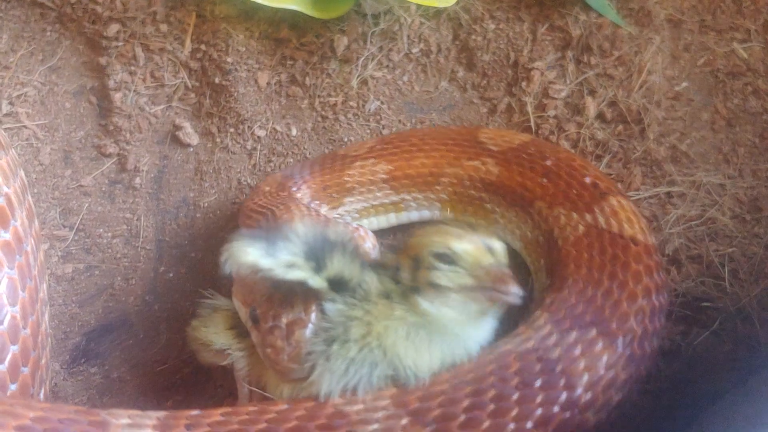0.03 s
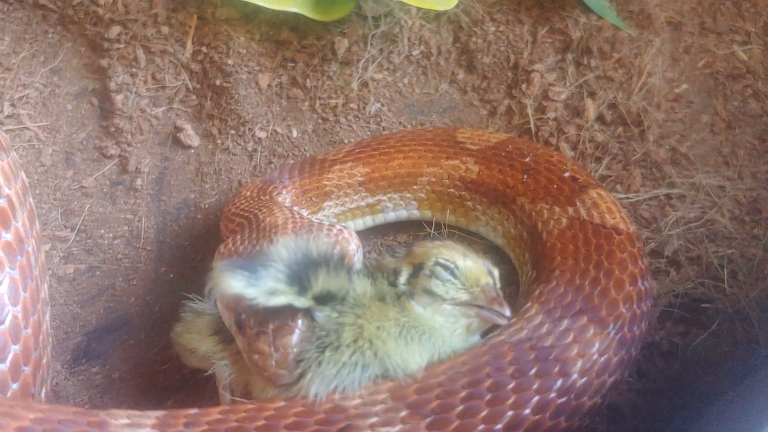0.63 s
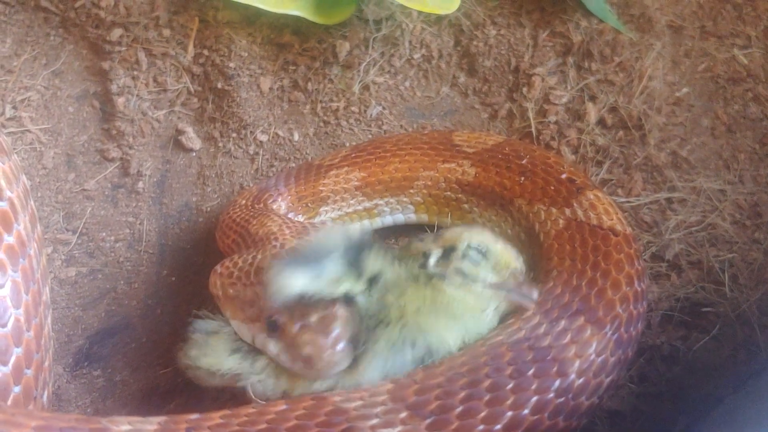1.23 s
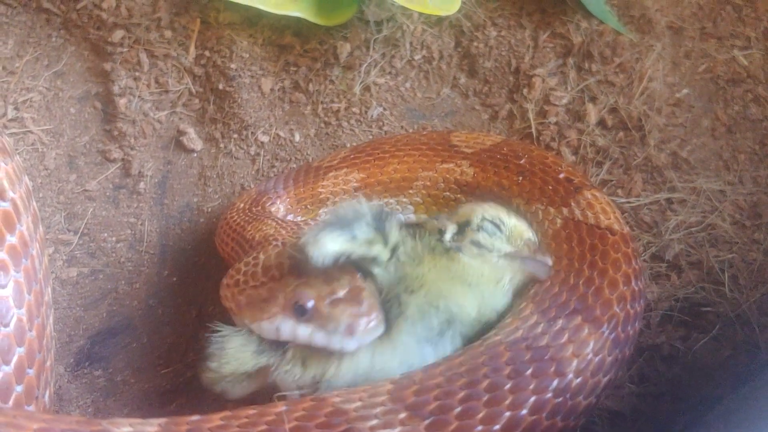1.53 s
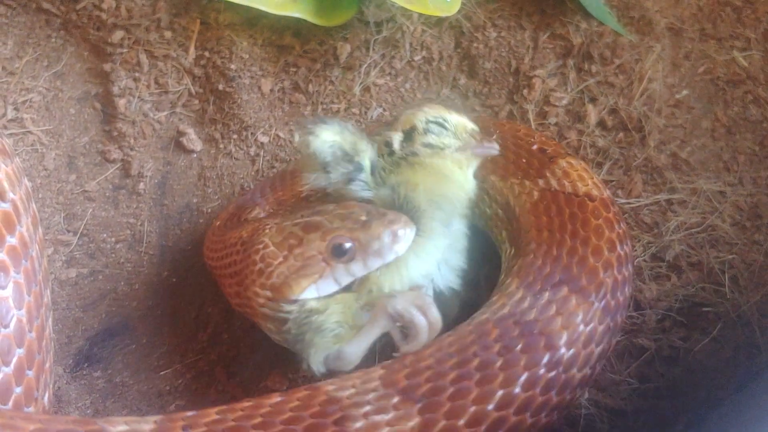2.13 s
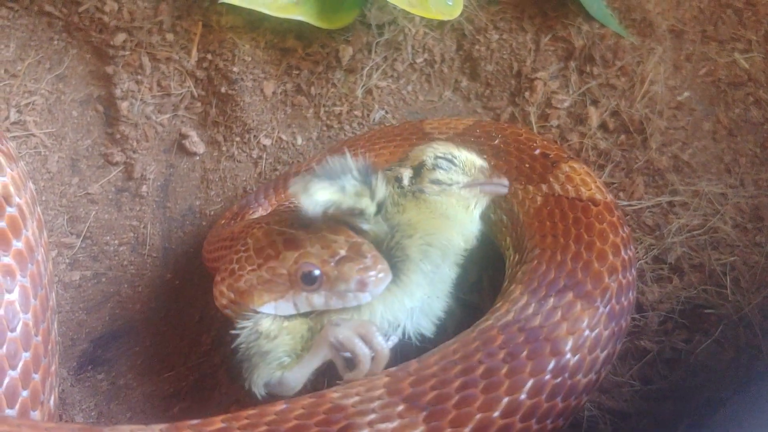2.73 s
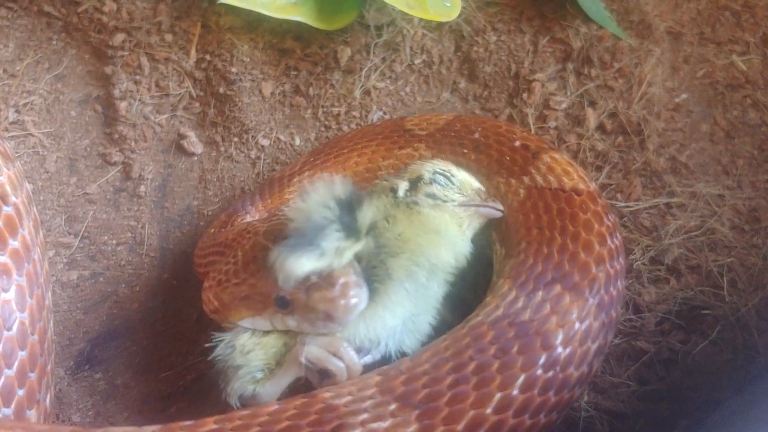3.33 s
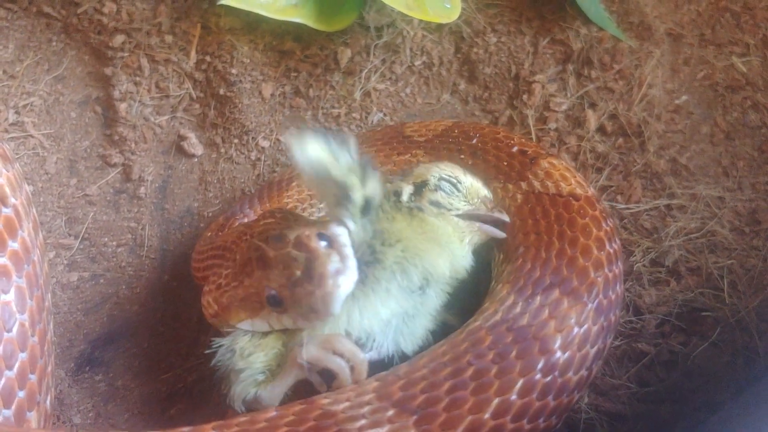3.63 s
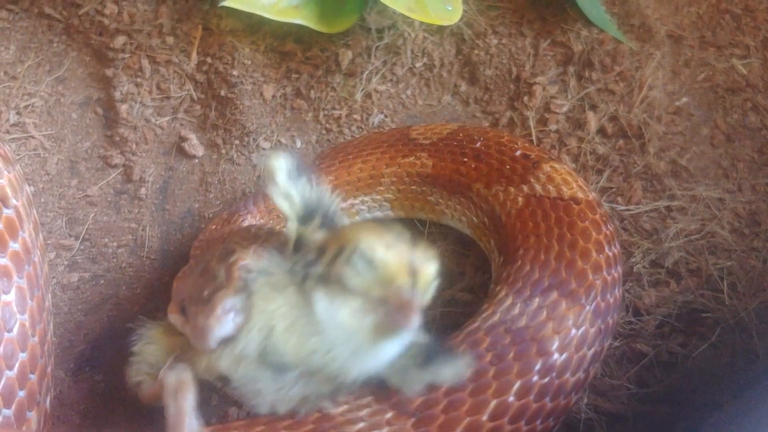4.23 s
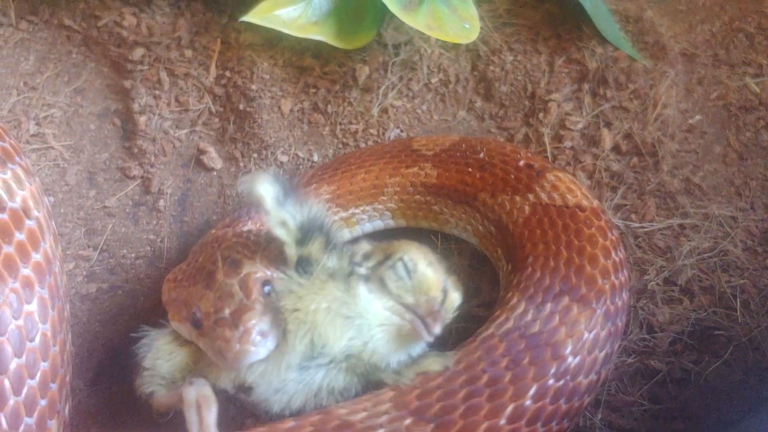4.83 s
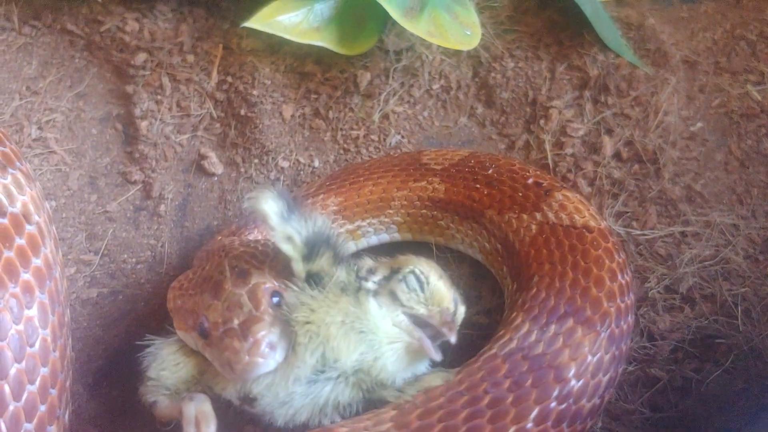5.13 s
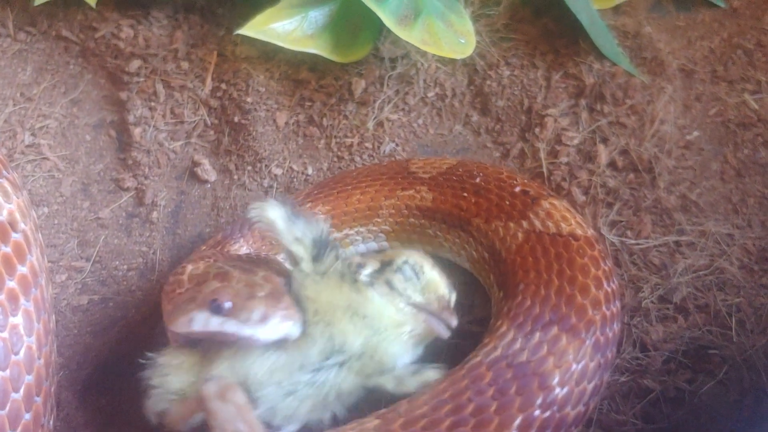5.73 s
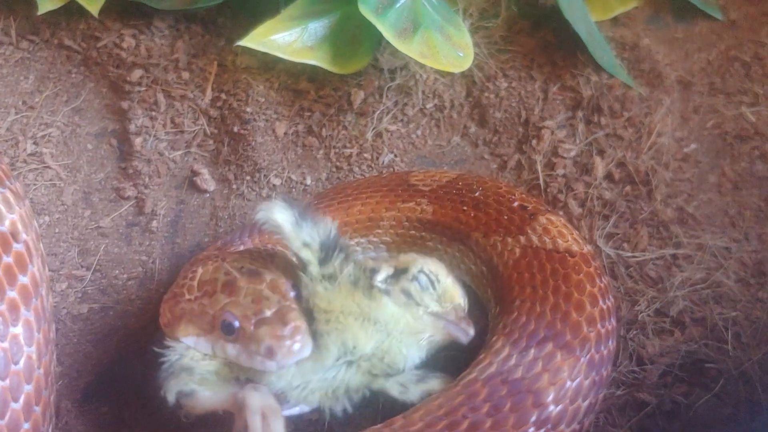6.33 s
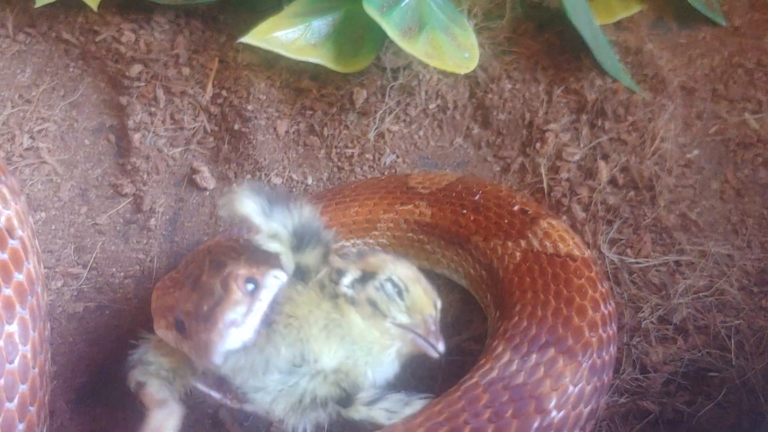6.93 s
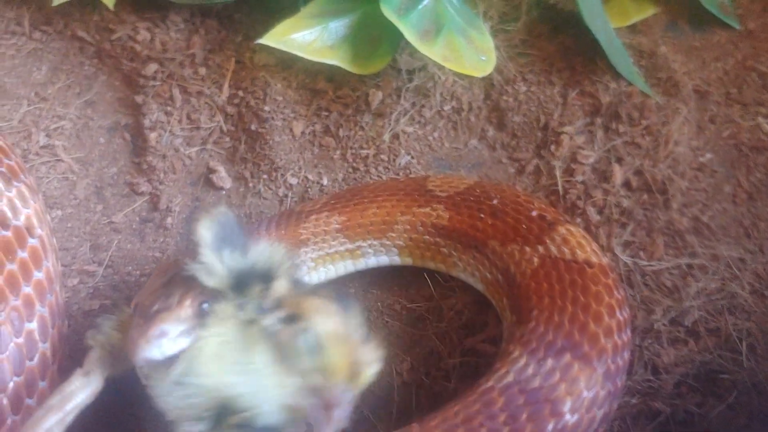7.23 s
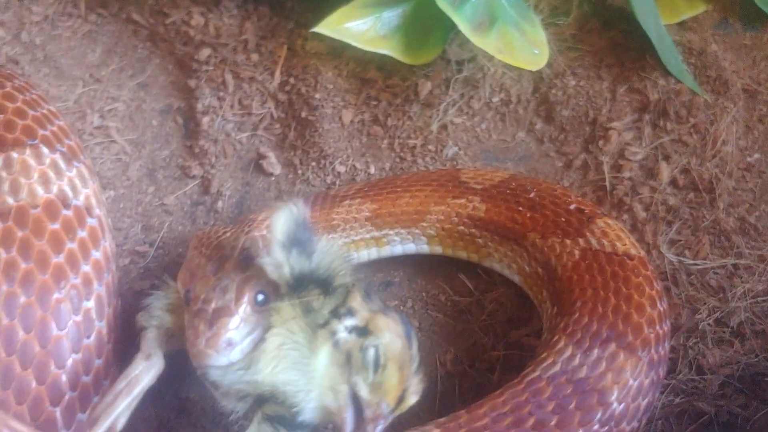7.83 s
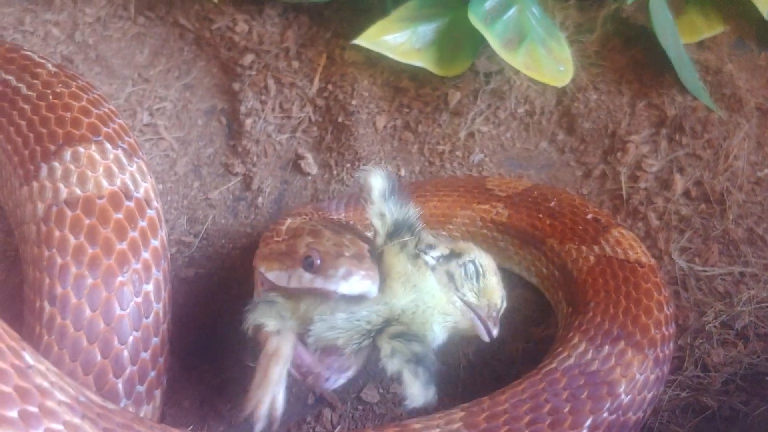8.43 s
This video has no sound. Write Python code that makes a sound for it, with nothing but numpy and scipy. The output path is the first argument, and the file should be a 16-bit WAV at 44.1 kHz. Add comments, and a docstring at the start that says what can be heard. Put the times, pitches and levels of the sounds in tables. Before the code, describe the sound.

Close to a phone microphone in a small terrarium, a quail chick held by a snake makes scattered dry creaks and thin, falling peeps, with tiny beak ticks. A wavering squawk rises about halfway through, then more peeps follow. Two light knocks on the phone and a faint dry rustle come late. Underneath, a low room rumble and hum pulses, briefly dropping between the calls.

```python
"""In a small terrarium, a quail chick held by a snake gives short falling peeps, dry creaks and one
rising squawk, close to a phone. Its syrinx either whistles a note that swells, sinks and fades, or flaps
in slowing pulses; a faint beak tick follows many calls. The bedding rustles and the phone is bumped
twice. Behind it all a room hums and throbs; the phone's noise suppressor briefly ducks the background
between calls."""
import sys
import numpy as np
from scipy import signal
from scipy.fft import rfft, irfft
from scipy.io import wavfile

SR = 44100
rng = np.random.default_rng(int(sys.argv[2]) if len(sys.argv) > 2 else 0)


def persist_wave(psi):
    """Save psi, clipped to +-1, as 16-bit WAV."""
    counts = np.round(np.clip(psi, -1, 1) * 32767).astype(np.int16)
    wavfile.write(sys.argv[1], SR, np.atleast_2d(counts).T)


N = 379260
T = np.arange(N) / SR

# Resonance of the chick's throat: freq_hz, relative_db
THROAT = [(500, -44), (1600, -40), (2200, -11), (2650, -17.5), (3300, 2.5), (4500, -3.5), (5700, -7.5),
          (6600, -15), (7800, -24.5), (9400, -30.5), (11000, -32.5), (13000, -44)]


def peeps(flutter_hz=900, pitch_jitter=0.068, third_db=-33, fourth_db=-40, edge_s=0.0012, rasp_db=-5):
    """The syrinx whistles a note whose octave the throat favours; strain shakes it and adds a rasp."""
    # Falling notes: start_s, length_s, crest_after_s, first_hz, last_hz,
    # bend (1 straight, more = steeper start), fundamental_db, octave_db, roughness (0-1)
    notes = [ (1.298, 0.023, 0.011, 2760, 2600, 1.8, -48, -46.5, .25),
             (1.750, .048, 0.015, 2376, 2165, 1.55, -44.5, -46, 0.4),
             (2.871, 0.027, .003, 2520, 2325, 1.9, -47, -45.5, 0.054),
             (3.493, 0.056, .010, 2814, 2470, 1.44, -41.5, -37.5, 0.037),
             (4.254, 0.046, .012, 4010, 2570, 3.1, -39, -44, 0.15),
             (4.594, 0.035, .002, 3150, 2820, 2.3, -51, -60, 0.36),
             (5.645, 0.011, .001, 2690, 2400, 2, -56, -46, 0.6),
             (5.658, 0.057, 0.02, 3250, 2644, 2.3, -36, -34.5, .04),
             (5.659, 0.02, .003, 3640, 3580, 0.74, -41, -62, 0.085),
             (6.118, 0.028, .002, 2650, 2330, 2.3, -46.5, -50, .12),
             (6.477, 0.028, .004, 3100, 2610, 2.6, -44.5, -43.5, 0.075),
             (6.938, .038, .003, 2097, 1680, 1.98, -73, -43, .12),
             (6.960, 0.043, 0.013, 2710, 2570, 1.2, -45, -44.5, 0.52),
             (6.992, 0.021, .003, 2870, 2630, 2.6, -48, -45, .05),
             (7.354, 0.044, .007, 2490, 2445, 1.6, -36, -50.5, 0.31),
             (8.182, 0.017, .001, 2700, 2480, 2.6, -50.5, -49.5, .06),
             (8.571, 0.02, .008, 2500, 1920, 4.5, -75, -37, 0.25), ]
    out, shake, tremble = np.zeros(N), wander(flutter_hz), wander(flutter_hz)
    turbulence = unit(signal.fftconvolve(rng.standard_normal(N), ring(THROAT))[:N])
    for s, hz, base_db, octave_db, rough in [peep_contour(*row) for row in notes] + [squawk_contour()]:
        t = T[:len(hz)]
        span = (int(s * SR) + np.arange(len(hz))) % N
        phase = 2 * np.pi * np.cumsum(hz * (1 + pitch_jitter * rough * shake[span])) / SR
        harmonics_db = [base_db, octave_db, octave_db + third_db, octave_db + fourth_db]
        tone = sum(undb(db) * np.sin((k + 1) * phase) for k, db in enumerate(harmonics_db))
        strained = tone * (1 + rough * tremble[span]) / np.sqrt(1 + rough ** 2)
        rasp = rough * undb(octave_db + rasp_db) * turbulence[span]
        edges = np.clip(np.minimum(t, t[-1] - t) / edge_s, 0, 1)
        add(out, s, edges * (strained + rasp))
    return out


def peep_contour(s, length, crest_s, first_hz, last_hz, bend, base_db, octave_db, rough):
    """One peep: the pitch falls, the level swells and dies ever faster, the hoarse start clears."""
    rise_db, fade_db, fade_bend = 9, 19.5, 1.38
    onset_rough, settle_s = .35, 0.0057
    t = T[:int(length * SR)]
    rising = np.clip(1 - t / max(crest_s, 1 / SR), 0, 1)
    fading = np.clip((t - crest_s) / max(length - crest_s, 1 / SR), 0, 1)
    effort_db = -rise_db * rising - fade_db * fading ** fade_bend
    thinning_db = 9 * (t - crest_s) / length  # the fundamental weakens against the octave
    hz = last_hz + (first_hz - last_hz) * (1 - t / length) ** bend
    hoarse = np.clip(rough + onset_rough * np.exp(-t / settle_s), 0, 1)
    return s, hz, base_db + effort_db - thinning_db, octave_db + effort_db, hoarse


def squawk_contour(waver=0.032, waver_hz=160):
    """One side of the syrinx strains upward in a wavering squawk, over a peep from the other side."""
    # Path of the squawk: time_s, pitch_hz, fundamental_db, octave_db, roughness (0-1)
    path = [(4.252, 2313, -55, -62, 0.8), (4.268, 1980, -43, -35, 0.65), (4.277, 2145, -37, -36.5, 0.1),
            (4.289, 2180, -36, -34, 0.2), (4.298, 2530, -32, -36, 0.17), (4.315, 2450, -54, -55, 0.3)]
    s, *columns = np.transpose(path)
    t = T[int(s[0] * SR):int(s[-1] * SR)]
    hz, base_db, octave_db, rough = (np.interp(t, s, column) for column in columns)
    return s[0], hz * (1 + waver * wander(waver_hz)[:len(t)]), base_db, octave_db, rough


def creaks(jitter=0.1, scatter_db=2, kick_db=2, flap_db=-6, flap_t60_s=0.0088, flap_spread=0.14):
    """With little air the syrinx only flaps: uneven, slowing pulses that each ring in the throat."""
    # Pulse trains: start_s, length_s, first_rate_hz, level_db, level_change_db, flap_ring_hz
    trains = [ (0.186, 0.011, 410, -34.5, -18, 3380), (1.2968, 0.02, 430, -32, -11, 3430),
              (1.7467, 0.041, 440, -31.5, -8, 3820), (2.341, .026, 430, -35, -5.5, 3680),
              (3.874, 0.03, 360, -27.5, -12, 4040), (4.2508, .044, 710, -35.5, 7.5, 4100),
              (6.1083, .008, 480, -39, -6, 4130), (6.9403, 0.05, 460, -35.5, -2, 5200),
              (7.6837, 0.014, 380, -35, -12, 5100), ]
    # Single pulses of the syrinx, some of them the sharp start of a peep: start_s, level_db
    chips = [(1.3287, -51), (2.3185, -51), (2.3261, -38), (2.3477, -27.5), (2.3627, -32), (3.4931, -31),
             (6.4785, -40.5), (7.3562, -44), (8.592, -38)]
    slowing = .45  # share of the pulse rate lost as the air runs out
    out, click, t = clicks(chips, THROAT), ring(THROAT), T[:SR // 50]
    envelope = decay(t, flap_t60_s) * (1 - np.exp(-t / 0.00026))
    for s, length, rate, db, change_db, hz in trains:
        done = 0
        for stretch, strength, tension in rng.standard_normal(size=(40, 3)):
            if done > 1:
                break
            accent_db = scatter_db * strength if done else kick_db
            gain = undb(db + change_db * done + accent_db)
            flap = envelope * np.sin(2 * np.pi * hz * np.exp(flap_spread * tension) * t)
            add(out, s + done * length, gain * click)
            add(out, s + done * length, gain * undb(flap_db) * flap)
            done += np.exp(jitter * stretch) / (rate * length * (1 - slowing * done ** 2))
    return out


def beak_ticks():
    """The beak gives a faint, bright tick after many calls."""
    # Ticks: start_s, level_db
    ticks = [(.2415, -47), (.790, -51), (1.3745, -50), (1.8212, -44.5), (2.4108, -44.5), (3.9417, -50),
             (6.1826, -50), (6.5907, -49), (7.055, -43.5), (7.3497, -38), (7.7729, -48)]
    # Resonance of the beak: freq_hz, relative_db
    beak = [(1000, -37), (3000, -13), (4500, -0.5), (6300, 7), (8000, -3.5), (12000, -30)]
    return clicks(ticks, beak)


def rustle(grain_db=5):
    """Dry fibres slip under the snake in many tiny grains."""
    # Shifts of the bedding: middle_s, length_s, level_db
    shifts = [(7.58, 0.61, -63), (7.8, 0.15, -62), (7.9, 0.097, -62)]
    # Colour of the fibres: freq_hz, relative_db
    bedding = [(600, -6), (1550, 5), (2400, -11), (3900, -6.5), (5200, -18), (9000, -26.5)]
    grains = rng.standard_normal(N) * undb(grain_db * wander(300))
    humps = sum(undb(db) * np.cos(np.pi * np.clip((T - s) / length, -.5, .5))
                for s, length, db in shifts)
    return unit(signal.fftconvolve(grains, ring(bedding))[:N]) * humps


def terrarium(x, wet_db=-13, box_t60_s=0.086, room_t60_s=.4, room_db=-17, left_lag_s=.0002):
    """Sound reaches the right mic first, dies quickly in the box and lingers faintly in the room."""
    # The nearer right mic hears the chick's low notes better: freq_hz, left_minus_right_db
    pan = [(2200, -8.5), (3400, -5), (4500, -7), (5600, 4.5)]
    t = T[:SR // 3]
    envelope = decay(t, box_t60_s) + undb(room_db) * decay(t, room_t60_s)
    channels = []
    for sign, lag_s in ((1, left_lag_s), (-1, 0)):
        panned = irfft(rfft(x) * undb(sign * spectrum(pan, N) / 2), N)
        direct = np.pad(panned, (round(lag_s * SR), 0))[:N]
        tail = rng.standard_normal(len(t)) * envelope * (t > .002)
        reverb = signal.fftconvolve(x, tail / np.linalg.norm(tail))[:N]
        channels.append(direct + undb(wet_db) * reverb)
    return np.array(channels)


def bumps(crunch_t60_s=0.068):
    """A knock on the phone's case rings a few short modes, mostly on the left, with a dull crunch."""
    # Knocks: start_s, crunch_db, modes as (pitch_hz, left_db, right_db, t60_s)
    knocks = [ (7.0022, -52, [(360, -14.5, -18, 0.0062), (1110, -14.5, -47, 0.0056),
              (1370, -27, -53, 0.013), (2090, -24.5, -56, 0.016), (6530, -26.5, -55, 0.0049),
              (8900, -27.5, -58, 0.0016)]), (7.7048, -39.5, [(70.3, -20, -23, 0.17), (347, -30, -37, 0.033),
              (1020, -41, -31, 0.0031), (1620, -20, -29, 0.021), (2350, -35, -27, 0.0021),
              (3660, -28.5, -43, 0.012), (9000, -48, -61, 0.018)]), ]
    out, t = np.zeros((2, N)), T[:SR // 8]
    dull = signal.butter(4, [300, 4400], "band", fs=SR, output="sos")
    for s, crunch_db, modes in knocks:
        for hz, left_db, right_db, t60_s in modes:
            add(out, s, undb([[left_db], [right_db]]) * np.sin(2 * np.pi * hz * t) * decay(t, t60_s))
        crunch = unit(signal.sosfilt(dull, rng.standard_normal((2, len(t)))))
        add(out, s, undb(crunch_db) * crunch * decay(t, crunch_t60_s))
    return out


def room_tone(duck, level_db=-35.5):
    """A centred rumble under a diffuse hiss with a few faint resonances."""
    # Colour of the room noise: freq_hz, relative_db
    colour = [(20, -34.5), (33, 0), (55, 3.5), (75, 1.5), (97, -3.5), (170, -10.5), (250, -18.5),
              (410, -20), (800, -32.5), (1150, -33), (2600, -54), (5000, -55.5), (8000, -68.5),
              (12000, -68)]
    # Ripples in that colour: centre_hz, half_width_hz, gain_db
    ripples = [(174, 10, 6), (482, 14, -10.5), (1935, 120, 4), (3550, 210, 2), (5290, 66, 5.5),
               (6550, 240, 8)]
    # Stereo width: freq_hz, side_minus_mid_db
    width = [(60, -20), (200, -9), (350, -8), (700, 2), (2000, 0.5)]
    # Stereo balance: freq_hz, left_minus_right_db
    pan = [(60, 2.1), (250, 0), (640, -3.5), (1150, -6), (2080, 4), (3770, -3.5), (6800, 1)]
    f = np.arange(N // 2 + 1) * SR / N
    ripple_db = sum(db * np.exp(-((f - hz) / half_width) ** 2) for hz, half_width, db in ripples)
    mid, side = rfft(rng.standard_normal((2, N))) * undb(spectrum(colour, N) + ripple_db)
    sign = np.array([[1], [-1]])
    wide = mid + sign * undb(spectrum(width, N)) * side
    stereo = irfft(wide * undb(sign * spectrum(pan, N) / 2), N)
    return stereo / stereo.mean(axis=0).std() * undb(level_db) * duck


def hum(duck, drone_hz=66, drone_db=-39, waver_rad=0.93, waver_hz=7, throb_edge_s=0.046, pan_db=2.5):
    """Mains and machine hum, and a low wavering drone that throbs now and then."""
    # Hum tones: pitch_hz, level_db
    tones = [(120, -43), (239, -63), (359, -61.5), (582, -72.5), (626, -70.5), (774, -70.5), (957, -69.5)]
    # Throbs of the drone: start_s, length_s, level_db
    throbs = [(0.83, 0.083, -34.5), (2.357, 0.092, -40), (2.707, 0.29, -33.5), (3.095, 0.098, -31.5),
              (4.733, .21, -28), (5.12, 0.484, -28.5), (5.654, 0.59, -33.5)]
    mains = sum(undb(db) * np.sin(2 * np.pi * hz * T + 0.33 * wander(5.1)) for hz, db in tones)
    surge = sum(undb(db) * plateau(s, s + length, throb_edge_s, throb_edge_s)
                for s, length, db in throbs)
    phase = 2 * np.pi * drone_hz * T + waver_rad * wander(waver_hz)
    drone = (undb(drone_db) * duck + surge) * np.sin(phase)
    return (np.sqrt(2) * mains * duck + drone) * undb([[pan_db / 2], [-pan_db / 2]])


def suppressor_gain(depth_db=-9, fall_s=0.039, return_s=0.021):
    """The phone's noise suppressor briefly ducks the background at set times between calls."""
    # Ducked spans: start_s, end_s
    spans = [(.445, .785), (.91, 1.275), (1.462, 1.725), (1.955, 2.308), (2.492, 2.86), (2.93, 3.472),
             (4.955, 5.29), (5.355, 5.622)]
    return undb(depth_db * sum(plateau(start, end, fall_s, return_s) for start, end in spans))


def shade_bass(x, shelf_hz=115):
    """The low end of the background starts weak and fills out."""
    # Bass ride: time_s, gain_db
    ride = [(0, -2.5), (1.9, -4.5), (2.4, 1), (4.5, -1.5), (5.9, -0.5), (8.6, 2)]
    bass = signal.sosfiltfilt(signal.butter(2, shelf_hz, fs=SR, output="sos"), x)
    return x + bass * (undb(np.interp(T, *np.transpose(ride))) - 1)


def undb(db):
    """Decibels to gain."""
    return 10 ** (np.asarray(db) / 20)


def unit(x):
    """Scale to rms 1."""
    return x / np.sqrt(np.mean(x ** 2))


def decay(t, t60_s):
    """Envelope that falls 60 dB in t60_s."""
    return np.exp(-np.log(1000) * t / t60_s)


def plateau(start, end, rise_s, fall_s):
    """1 from start to end and 0 outside, with sloping edges."""
    return np.clip(.5 + np.minimum((T - start) / rise_s, (end - T) / fall_s), 0, 1)


def spectrum(points, size):
    """(Hz, dB) points joined on a log axis, as dB per transform bin."""
    hz, db = np.transpose(points)
    return np.interp(np.log(np.arange(size // 2 + 1) * SR / size + 1), np.log(hz), db)


def wander(hz):
    """Smooth random motion of spread 1, with little above hz."""
    f = np.arange(N // 2 + 1) * SR / N
    return unit(irfft(rfft(rng.standard_normal(N)) * np.exp(-(f / hz) ** 2), N))


def ring(points, size=512):
    """Minimum-phase click with the given spectrum and peak 1."""
    cepstrum = irfft(np.log(undb(spectrum(points, size))))
    cepstrum[1:size // 2] *= 2
    cepstrum[size // 2 + 1:] = 0
    click = irfft(np.exp(rfft(cepstrum)))
    return click / np.abs(click).max()


def clicks(rows, body):
    """Each (start_s, level_db) pulse rings the body once."""
    out, click = np.zeros(N), ring(body)
    for s, db in rows:
        add(out, s - .0002, undb(db) * click)
    return out


def add(out, s, x):
    """Mix x into out from time s on."""
    i = int(np.clip(round(s * SR), 0, N - 1))
    out[..., i:i + x.shape[-1]] += x[..., :N - i]


def scene():
    """The chick and bedding in their box, the bumps and the room behind."""
    duck = suppressor_gain()
    chick = peeps() + creaks() + beak_ticks()
    return terrarium(chick + rustle()) + bumps() + shade_bass(room_tone(duck) + hum(duck))


def record(dry):
    """The phone cuts the treble above 12 kHz."""
    return signal.sosfilt(signal.ellip(8, .2, 70, 12000, fs=SR, output="sos"), dry)


dry = scene()
out = record(dry)
persist_wave(out)
```